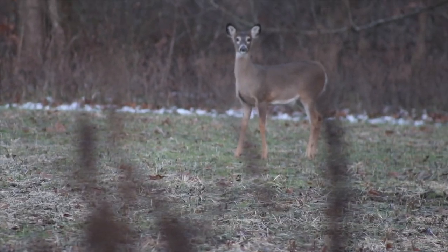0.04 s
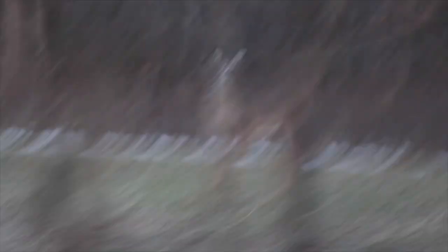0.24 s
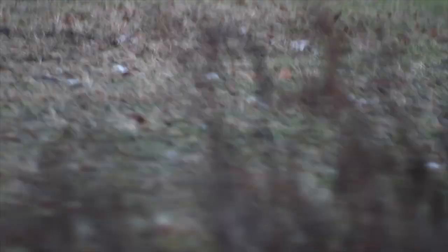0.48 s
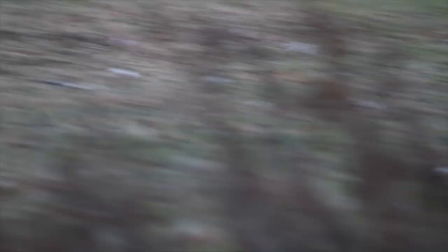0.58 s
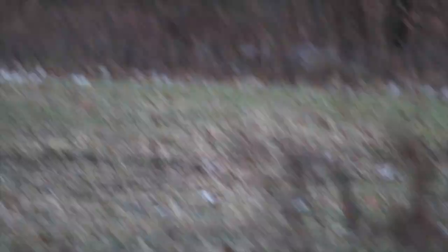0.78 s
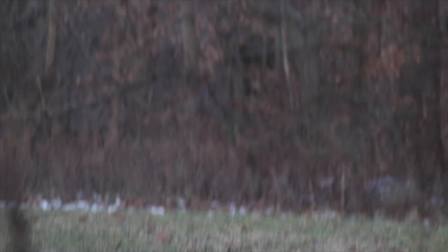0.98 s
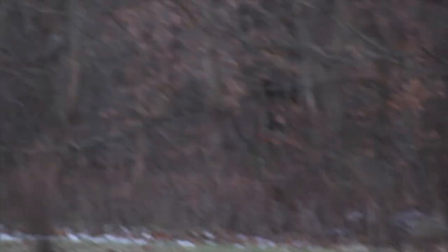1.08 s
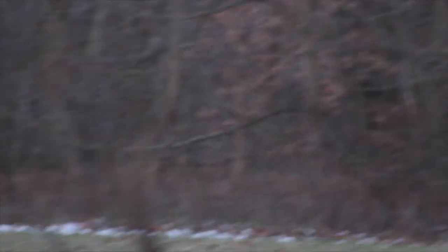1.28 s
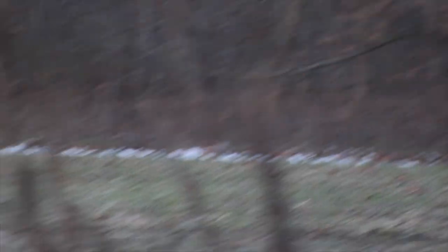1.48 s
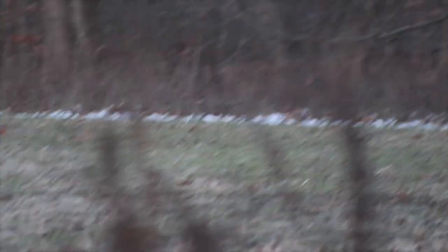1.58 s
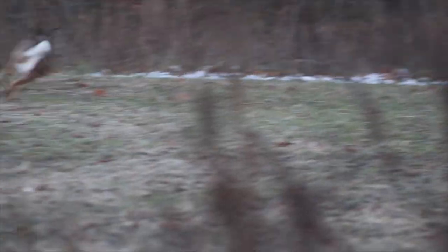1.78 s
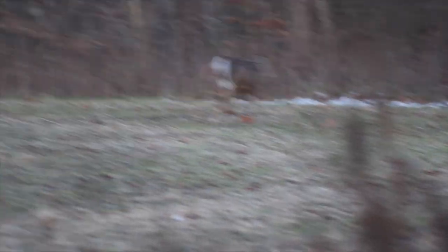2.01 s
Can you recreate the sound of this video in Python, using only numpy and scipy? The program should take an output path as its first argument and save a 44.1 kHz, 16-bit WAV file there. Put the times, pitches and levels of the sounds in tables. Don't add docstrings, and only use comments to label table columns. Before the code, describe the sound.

A single rifle shot blasts at a field's edge, its clattering echo fading through the woods

```python
import sys
import numpy as np
from scipy import signal
from scipy.fft import rfft, irfft
from scipy.io import wavfile
from scipy.ndimage import uniform_filter1d

SR = 44100
rng = np.random.default_rng(int(sys.argv[2]) if len(sys.argv) > 2 else 0)


def to_wav(sig):
    pcm = np.clip(np.atleast_2d(sig), -1, 1) * 32767
    pcm = np.round(pcm).astype(np.int16)
    wavfile.write(sys.argv[1], SR, pcm.T)


def makeup_ratio(level_db):
    decades = np.asarray(level_db, float) / 20
    return 10 ** decades


N = 90404

# level_db, fade_db_per_s, treble_fade_db_per_s (extra, at 1 kHz),
# echoes_per_s, size_spread_db, clumping_db
BRUSH = (-10, 30, 2., 9000, 2.5, .6)
WOOD = (0.33, 72.7, 4.3, 7900, 2.8, 0.83)
TWIGS = (-9, 37, 12.5, 8996, -5, 4)
FAR_TREES = (-17, 19.5, 3.42, 1491.5, 2, 1.5)
VALLEY = (-37.5, 18.5, 3, 912.5, 1, 6)
# start_s, rise_s, hold_s
BRUSH_TIMES = (.2002, .0005, 0)
WOOD_TIMES = (.2412, .002, .06)
TWIGS_TIMES = (.244, .006, .03)
FAR_TREES_TIMES = (.46, .16, .27)
VALLEY_TIMES = (.65, .025, .1)
# pitch_hz, level_db
BRUSH_TONE = [(24, -52.5), (40, -21), (416, -18), (947, -7), (2380, -1.5), (3920, -3), (4550, -9.5),
              (10400, -10.5), (15400, -30)]
WOOD_TONE = [(18, -34.5), (30, -11.5), (236, -17.5), (466, -3.5), (589, -9), (1220, -5), (1360, -4.5),
             (2970, -8), (15400, -18)]
TWIGS_TONE = [(3500, -32.5), (6000, 9), (10000, 18.5), (15000, -18.5)]
FAR_TREES_TONE = [(150, -61), (250, -53), (312, -25), (471, -9), (1250, -1), (2800, -9.5), (3750, -16),
                  (9610, -31.5), (15000, -47.5)]
VALLEY_TONE = [(24, -85), (40, -80), (124, 0), (166, 4.5), (218, 2.5), (300, -15.5), (390, -59),
               (660, -120)]
# pitch_hz, likeness (1 = the same, 0 = unrelated)
NEAR_LIKENESS = [(60, 0.38), (180, 1), (550, 0.7), (1650, -0.23), (4960, -0.1), (15000, 0.04)]
FAR_LIKENESS = [(60, 0.63), (180, 1), (550, 0.86), (1650, 0.25), (4960, 0.09), (15000, 0.01)]
# pitch_hz, left_minus_right_db
LEAN = [(60, -15.5), (240, 8.5), (950, 0), (3770, 2.5), (15000, 1.5)]
# start_s, peak_db, pitch_hz,
# left_minus_right_db
WOOD_SLAPS = [(0.437, -0.5, 1160, -3), (0.501, -3.5, 772, 1), (0.507, -6, 730, -2.5), (0.563, -9, 1085, 8),
              (0.598, -2.5, 1230, 0.5), (0.601, 1, 1230, 0), (0.607, -1, 1400, -6.5),
              (0.616, -11, 1570, -2.0), (0.627, 3.5, 1410, -2.5), (0.637, 3, 1570, -4.5),
              (0.654, -8, 921, -2.5), (0.668, -3, 1390, -0.5), (0.675, -3, 1180, -7.5),
              (0.679, 2, 1210, -0.5), (0.693, -3, 1370, -5.5), (0.697, 0.5, 1483, -3.0),
              (0.728, -1, 1350, 4.5), (0.738, 0, 1200, -6.5), (0.795, -5, 1040, 6), (0.85, -6, 990, 10),
              (0.862, -4, 1130, 1.0), (0.889, -8.5, 1120, 6), (0.92, -8, 1070, 3), (0.995, -12, 1140, -2),
              (1.014, -13.5, 1490, 3), (1.037, -10, 1260, -5.5), (1.077, -12, 1070, 1),
              (1.166, -14.5, 1290, -1), (1.247, -17, 1120, -8), (1.347, -15, 1114, -2.5),
              (0.222, -10, 991, -4.5),
    (0.241, 3.5, 813, 3.5),
    (0.253, 6, 1093, 2),
    (0.338, -9, 883, 0),
    (0.35, -10.5, 918, -2),
    (0.371, -3, 578, 7),
    (0.382, 2, 1330, -4.5),
]
# start_s, peak_db, left_minus_right_db
THUMPS = [
    (0.242, -14.5, 3),
    (.285, -29, -1.5),
    (0.371, -27, -1.5),
    (0.627, -34.5, -7),
]
# start_s, peak_db, pitch_hz
CREAKS = [
    (1.2862, -64, 4730),
    (1.5226, -58, 5470),
    (1.754, -55, 6300),
    (1.7639, -62.5, 6210),
    (1.7817, -65, 6210),
]
# pitch_hz, level_db
AIR_TONE = [(18, -42), (30, -13), (74, -2), (102, -14.5), (116, -18), (322, -15.5), (598, -20), (4210, -34),
            (6000, -41), (7800, -58), (13200, -120)]

SHOT_S, CRACK_S = .2, .4864


def read(points, hz):
    table_hz, value = np.transpose(points)
    return np.interp(np.log(hz + 1), np.log(table_hz + 1), value)


def evened(x):
    return x / np.sqrt(np.mean(x ** 2) + 1e-20)


def add(mix, start_s, sound):
    part = mix[:, round(start_s * SR):][:, :sound.shape[1]]
    part += sound[:, :part.shape[1]]


def pair(pan_db):
    return makeup_ratio(np.array([[pan_db / 2], [-pan_db / 2]]))


def blast():
    step_s, fade_60db_s, bounce_gain = .00011, .02, .8
    t = np.arange(1500) / SR
    step = -(1 - t / step_s) * np.exp(-t / step_s)
    chosen = rng.standard_normal((2, 1500)) * (rng.random((2, 1500)) < .1)
    bounces = chosen * makeup_ratio(-60 * t / fade_60db_s) * bounce_gain
    bounces[:, 0] = 1
    return makeup_ratio(17) * signal.fftconvolve(bounces, step[None])[:, :1500]


def crack():
    length_s, pitch_hz, glide = .0017, 2920, .12
    u = np.arange(0, length_s, 1 / SR) / length_s
    phase = 2 * np.pi * pitch_hz * length_s * (u + glide * (u ** 2 - u))
    ring = np.sin(np.pi * u)[None] ** .5 * (np.sin(phase) + 0.09 * np.cos(2 * phase))

    snap_band = signal.butter(1, [3500, 10000], "band", fs=SR)
    snap = evened(signal.lfilter(*snap_band, rng.standard_normal((2, 80))))
    snap = snap * np.exp(-np.arange(80) / 22)
    reflection = np.hanning(60) * np.sin(2 * np.pi * 2100 * np.arange(60) / SR)

    out = np.zeros((2, 600))
    add(out, 0, ring * pair(0))
    add(out, .7 * length_s, makeup_ratio(-2.5) * snap)
    add(out, .0032, makeup_ratio(-11) * reflection * pair(-4))
    return makeup_ratio(5) * out


def scatter(times, place, tone, likeness, pan_db, size=256):
    start_s, rise_s, hold_s = times
    level_db, fade_db, treble_fade_db, echoes_per_s, spread_db, clump_db = place
    seconds = np.arange(N) / SR

    crowd = 1 + 3 * np.maximum(seconds - start_s, 0)
    chance = rng.random((2, N))
    echo_size = np.minimum(rng.exponential(1, (2, N)), 5)
    sign = np.sign(rng.standard_normal((2, N)))
    echoes = sign * (chance < echoes_per_s * crowd / SR) / np.sqrt(crowd) * makeup_ratio(spread_db * echo_size)
    clumps = uniform_filter1d(rng.standard_normal(N), size=200)
    clumps = evened(uniform_filter1d(clumps, size=200))
    echoes = evened(echoes) * makeup_ratio(clump_db * clumps)

    hz, t, z = signal.stft(echoes, SR, nperseg=size, noverlap=size * 3 // 4)
    same = np.clip(read(likeness, hz), -1, 1)[:, None]
    right = same * z[0] + np.sqrt(1 - same ** 2) * z[1]
    z = np.array([z[0], right * makeup_ratio(-read(LEAN, hz))[:, None]])
    housing_dip_db = -5.5 * np.exp(-((hz - 4844) / 800) ** 2)
    colour = evened(makeup_ratio(read(tone, hz) + housing_dip_db))[:, None]
    loss_db_per_s = fade_db + treble_fade_db * (hz[:, None] / 1000) ** 1.373
    z = z * colour * makeup_ratio(-loss_db_per_s * np.maximum(t - start_s - hold_s, 0))
    x = signal.istft(z, SR, nperseg=size, noverlap=size * 3 // 4)[1][:, :N]

    rise = np.clip((seconds - start_s) / rise_s, 0, 1)
    return makeup_ratio(level_db) * pair(pan_db) * x * rise


def slap(start_s, peak_db, pitch_hz, pan_db, noise):
    cycles, rustle_s = 1.566, .005
    t = np.arange(600) / SR
    u = t * pitch_hz / cycles
    later_s = start_s - .6

    phase = noise[0, 0] + np.array([[0], [.4]])
    tone = np.sin(2 * np.pi * cycles * u + phase)
    ring = u * np.exp(1 - u - (u / 3.2) ** 2) * tone

    grit_top_hz = 2.6 * pitch_hz * np.exp(-.5 * later_s)
    grit_band = signal.butter(2, [pitch_hz, grit_top_hz], "band", fs=SR, output="sos")
    grit = evened(signal.sosfilt(grit_band, noise[0] + .8 * noise[1:]))
    rustle = np.minimum(u, 1) * np.exp(-t / rustle_s) * np.cos(np.pi / 2 * t / t[-1]) * grit

    sound = makeup_ratio(peak_db - 4) * pair(np.clip(pan_db, -5, 3)) * (ring + 0.31 * rustle)
    air_top_hz = 9000 * np.exp(-1.3 * later_s)
    return signal.sosfilt(signal.butter(4, air_top_hz, fs=SR, output="sos"), sound)


def thump(peak_db, pan_db):
    u = np.arange(1500) / SR / .003
    return makeup_ratio(peak_db) * pair(pan_db) * u * (2 - u) * np.exp(-u) * 2


def creak(peak_db, pitch_hz):
    t = np.arange(500) / SR
    band = signal.butter(2, [pitch_hz * 0.69, pitch_hz * 1.6], "band", fs=SR)
    noise = signal.lfilter(*band, rng.standard_normal((2, 500)))
    return makeup_ratio(peak_db - 0.5) * evened(noise) * makeup_ratio(-60 * t / .012)


def air():
    hz = np.fft.rfftfreq(N, 1 / SR)
    rumble, hiss = rfft(rng.standard_normal((2, 2, N)))
    rumble = rumble + 0.2 * rumble[::-1]
    rumble = evened(irfft(rumble * makeup_ratio(read(AIR_TONE, hz)), N))
    duck = makeup_ratio(-26 * (np.arange(N) / SR > SHOT_S))
    hiss_colour = hz / (hz + 3010) / (1 + (hz / 11500) ** 6)
    hiss = evened(irfft(hiss * hiss_colour, N))
    return makeup_ratio(-68) * rumble * duck + makeup_ratio(-73) * hiss


def scene():
    mix = scatter(BRUSH_TIMES, BRUSH, BRUSH_TONE, NEAR_LIKENESS, -2)
    mix += scatter(WOOD_TIMES, WOOD, WOOD_TONE, NEAR_LIKENESS, -4.5, size=512)
    mix += scatter(TWIGS_TIMES, TWIGS, TWIGS_TONE, NEAR_LIKENESS, -14)
    mix += scatter(FAR_TREES_TIMES, FAR_TREES, FAR_TREES_TONE, FAR_LIKENESS, -3, size=512)
    mix += scatter(VALLEY_TIMES, VALLEY, VALLEY_TONE, FAR_LIKENESS, 0, size=1024)
    add(mix, SHOT_S, blast())
    add(mix, CRACK_S, crack())
    for start_s, *settings in WOOD_SLAPS:
        noise = rng.standard_normal((3, 600))
        add(mix, start_s, slap(start_s, *settings, noise))
    for start_s, *settings in CREAKS:
        add(mix, start_s, creak(*settings))
    mix = signal.lfilter(*signal.butter(2, 210, "high", fs=SR), mix)
    for start_s, *settings in THUMPS:
        add(mix, start_s, thump(*settings))
    return mix + air()


def top_cut(x):
    return signal.sosfilt(signal.butter(12, 15570, fs=SR, output="sos"), x)


def record(dry):
    clipped = np.clip(dry, -1, 1)
    return top_cut(clipped)


dry = scene()
out = record(dry)
to_wav(out)
```